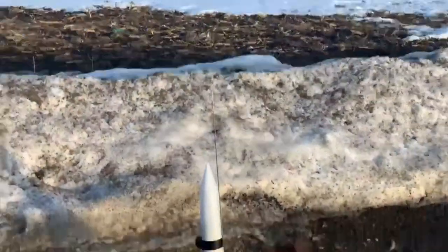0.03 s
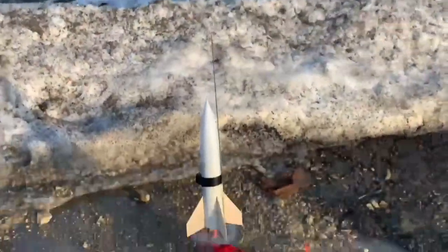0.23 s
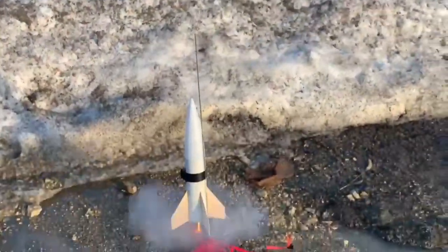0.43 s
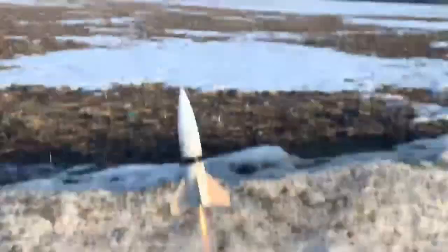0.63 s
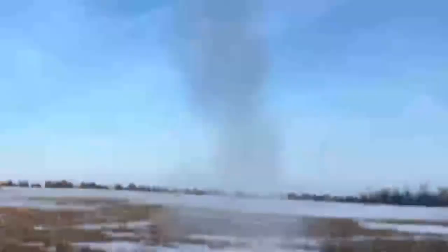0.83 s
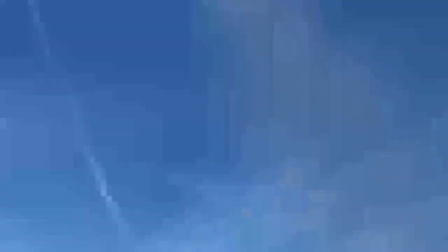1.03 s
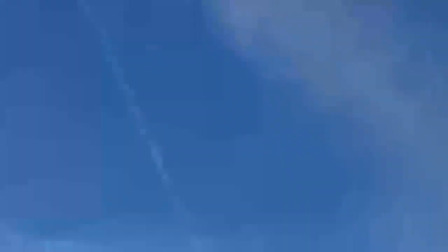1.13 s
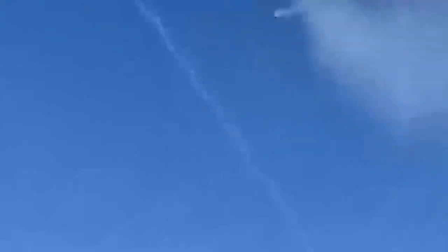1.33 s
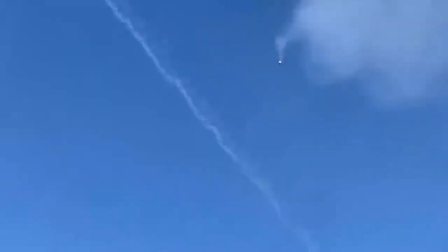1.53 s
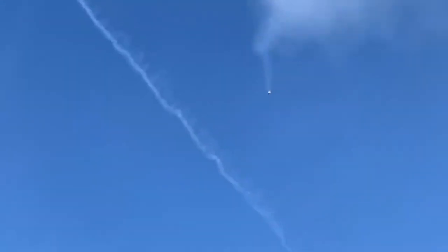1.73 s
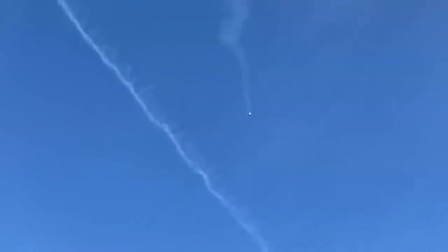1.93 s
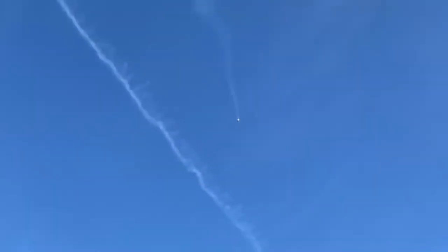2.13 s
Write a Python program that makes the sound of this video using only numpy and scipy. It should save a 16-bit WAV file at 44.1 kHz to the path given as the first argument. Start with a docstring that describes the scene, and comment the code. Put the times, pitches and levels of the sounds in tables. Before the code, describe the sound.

A model rocket lifts off a few steps away in an open field. The motor catches with thin pops, hisses loudly, whooshes past and fades to a distant sputter. Faint wind and soft microphone bumps remain.

```python
"""Model rocket lift-off from a snowy field

A few steps away the igniter fizzes, the motor catches with a few pops, and its jet hisses and howls
on the blast plate. The plume roars past as the rocket leaves the rod, then thins to a distant hiss
until burnout. A light wind and a few soft bumps on the microphone remain."""
import sys
import numpy as np
from scipy import signal
from scipy.fft import rfft, irfft
from scipy.io import wavfile

SR = 44100
rng = np.random.default_rng(int(sys.argv[2]) if len(sys.argv) > 2 else 0)


def log_audio(samples):
    """Write samples as a 16-bit WAV file to the path given in sys.argv[1]."""
    # one column per channel
    frames = np.atleast_2d(samples).T
    # limit to full scale, then quantise
    limited = np.clip(frames, -1, 1)
    pcm = np.round(limited * 32767).astype(np.int16)
    wavfile.write(sys.argv[1], SR, pcm)


N = 97020


def motor():
    """The whole burn, from the pad to the sky, with one turbulent flutter on every layer."""
    flutter_db, flutter_hz = 0.51, 35
    jet = jet_on_plate() + plume() + nozzle_hiss() + climb()
    return jet * from_db(flutter_db * slow_noise(flutter_hz, channels=1))


def jet_on_plate():
    """The jet splashes on the blast plate and howls in a sinking resonance."""
    # splash envelope (time [s], level [dB])
    level = [(.14, -115), (.165, -70), (.196, -56), (.214, -25), (.25, -23), (.31, -21.5), (.41, -16.5),
             (.48, -19.5), (.54, -19.5), (.58, -30.5), (.68, -43.5), (.8, -100)]
    # splash colour (frequency [Hz], level [dB])
    spectrum = [(120, -29), (270, -16), (430, -20.5), (600, -12.5), (1150, -23), (1450, -7.5), (2300, -2.5),
                (3100, -11.5), (3600, -3), (5300, -7.5), (7600, -5), (8700, 3), (10100, -1), (11200, -15),
                (15500, -12.5)]
    # resonance of the jet (time [s], level [dB], centre [Hz])
    howl = [(.19, -110, 1993), (.218, -31.5, 1932), (.33, -31, 1759), (.41, -23, 1654), (.45, -26.5, 1630),
            (.475, -38, 1571), (.56, -32.5, 1545), (.65, -110, 1570)]
    return flow(level, spectrum) + resonance(howl, width_hz=480)


def plume():
    """The free plume roars past with a bright whoosh as the rocket leaves the rod."""
    # roar envelope (time [s], level [dB])
    level = [(.4, -120), (.5, -50.5), (.56, -22), (.6, -21), (.67, -17.5), (.71, -24), (.76, -25),
             (.772, -49.5), (.85, -46.5), (.9, -110)]
    # roar colour (frequency [Hz], level [dB])
    spectrum = [(30, -24.5), (130, -13), (480, -13), (700, -9.5), (1100, -8.5), (1450, -4), (2600, 0),
                (4800, -2), (8000, -4), (10000, -9), (15500, -12.5)]
    # high resonance of the jet (time [s], level [dB], centre [Hz])
    whoosh = [(.42, -120, 7280), (.53, -21, 7180), (.62, -32, 7310), (.69, -33, 7930), (.745, -19, 7760),
              (.8, -68, 7750), (.83, -120, 7750)]
    return flow(level, spectrum) + resonance(whoosh, width_hz=1200)


def nozzle_hiss():
    """The fine hiss of the nozzle carries through the whole burn."""
    # hiss envelope (time [s], level [dB])
    level = [(.185, -115), (.215, -40), (.35, -21), (.42, -13), (.52, -16), (.6, -19.5), (.68, -27),
             (.73, -17), (.78, -18), (.82, -24.5), (.88, -33.5), (1, -35), (1.07, -40.5), (1.16, -69.5),
             (1.25, -110)]
    # hiss colour (frequency [Hz], level [dB])
    spectrum = [(900, -42.5), (2900, -27), (3600, -17), (6400, -9.5), (7500, -12.5), (8200, 0), (9800, 1),
                (11500, -4.5), (15500, -5.5)]
    return flow(level, spectrum)


def climb():
    """The roar from high above sputters, hollowed by a reflection."""
    # distant roar envelope (time [s], level [dB])
    level = [(.66, -120), (.78, -47.5), (.9, -50.5), (.99, -45), (1.05, -50.5), (1.11, -58.5), (1.17, -83),
             (1.3, -110)]
    # distant roar colour (frequency [Hz], level [dB])
    spectrum = [(100, -18.5), (280, -9.5), (500, -24.5), (660, -2.5), (1000, 7.5), (1400, -3), (2400, -2),
                (2900, -6.5), (3700, 3.5), (7500, -8), (12000, -15)]
    # bounce off a surface by the microphone (delay [s], signed gain)
    bounce = [(.00092, -.45)]
    sputter_db, sputter_hz = -1, 37
    roar = flow(level, spectrum) * from_db(sputter_db * slow_noise(sputter_hz, channels=1))
    return reflected(roar, bounce)


def igniter():
    """The igniter fizzes as it burns, just before the motor catches."""
    # fizz envelope (time [s], level [dB])
    level = [(.115, -80), (.13, -69), (.163, -54.5), (.2, -56.5), (.3, -100)]
    # fizz colour (frequency [Hz], level [dB])
    spectrum = [(100, 3.5), (300, -12.5), (700, -4.5), (1050, -1.5), (1600, -15.5), (6500, -37.5)]
    return flow(level, spectrum)


def ignition_pops():
    """The propellant catches in a few thin pops, heard slightly later in the right channel."""
    # pops (time [s], level [dB], pitch [Hz], swell [s])
    pops = [(.2154, -7.5, 1700, 0.00031), (.2156, -15, 3890, 0.00046), (.2193, -17.5, 2100, .0005),
            (.2325, -6, 4040, 0.00061), (.2364, -7.5, 3970, .00033)]
    right_lag_s = .00045
    pulses = puffs(pops, grit=0.27, grit_hz=780, crack=.13, crack_hz=8034)
    treble = rfft(pulses) * above(hz=710)
    delay = np.exp(-2j * np.pi * np.fft.rfftfreq(N, 1 / SR) * right_lag_s)
    return irfft(np.array([treble, treble * delay]), N)


def exhaust_blast():
    """Exhaust buffets the microphone with a mono rumble."""
    # rumble envelope (time [s], level [dB])
    level = [(.19, -88), (.23, -49), (.54, -61), (.6, -42), (.66, -44.5), (.72, -57), (.768, -43.5),
             (.85, -110)]
    # rumble colour (frequency [Hz], level [dB])
    spectrum = [(20, -19), (45, -9), (64, 1), (85, -5.5), (200, -14), (600, -39)]
    return flow(level, spectrum)[0]


def field_echo(x):
    """Faint scatter from the open ground, dying away."""
    # echo colour (frequency [Hz], level [dB])
    spectrum = [(100, -14), (1000, 7), (5000, -9), (9000, -4.5), (15500, -15.5)]
    echo_db, t60_s = -30.5, .9
    tail = noise(spectrum) * from_db(-60 * np.arange(N) / SR / t60_s)
    tail /= np.sqrt(np.sum(tail ** 2, axis=1, keepdims=True))
    return from_db(echo_db) * signal.fftconvolve(x, tail, axes=1)[:, :N]


def bumps():
    """Soft knocks on the microphone, muffled by its housing."""
    # knocks (time [s], level [dB], pitch [Hz], swell [s])
    knocks = [(1.269, -65, 230, .002), (1.478, -68, 279.7, 0.0018), (1.6478, -56, 720, 0.00041),
              (1.712, -53.5, 119, .0038), (1.9, -62.5, 298, 0.0047), (2.016, -58, 400.6, 0.00095)]
    pulses = puffs(knocks, grit=0.55, grit_hz=91, crack=0.12, crack_hz=449)
    return low_pass(pulses, hz=1400)


def wind():
    """A light wind presses on the microphone with a ragged flutter, in mono."""
    # gust envelope (time [s], level [dB])
    level = [(.9, -93), (.99, -72), (1.13, -70.5), (1.21, -64), (1.29, -67), (1.36, -72.5), (1.45, -70.5),
             (1.58, -68), (1.73, -65), (1.91, -59), (2.12, -66.5), (2.2, -66)]
    # wind colour (frequency [Hz], level [dB])
    spectrum = [(20, -11), (45, 1.5), (70, 5), (140, -3), (250, -13), (450, -26), (900, -41.5),
                (3000, -71.5)]
    buffet_db, buffet_hz = 3, 22
    gusts = flow(level, spectrum) * from_db(buffet_db * slow_noise(buffet_hz, channels=1))
    return gusts[0]


def field_ambience():
    """The steady hush of the field."""
    # hush colour (frequency [Hz], level [dB])
    spectrum = [(450, -9.5), (750, 0.5), (1200, -7), (1800, -8.5), (3000, -20), (4500, -26.5), (6000, -35)]
    return from_db(-83.5) * noise(spectrum)


def reflected(x, reflections):
    """Direct sound plus early reflections, whose paths shift as the hand-held microphone sways."""
    sway_share, sway_hz = .05, 4
    now = np.arange(N)
    stretch = 1 + sway_share * slow_noise(sway_hz, channels=1)[0]
    copies = np.zeros_like(x)
    for delay_s, gain in reflections:
        copies += gain * np.array([np.interp(now - delay_s * stretch * SR, now, side) for side in x])
    return (x + copies) / np.sqrt(1 + sum(gain ** 2 for _, gain in reflections))


def microphones(pair):
    """A stereo pair: mono in the bass, diffuse in the mids, the treble slightly later on the left."""
    # stereo image (frequency [Hz], left-right likeness [0-1], left over right [dB])
    image = [(750, 0.75, 1), (1620, 0.4, 0), (2400, 0.6, -0.5), (5600, 0.2, -2), (7100, .82, -0.5),
             (10000, 1, 0.05), (15000, 1, 0)]
    mono_below_hz, left_lag_s, lag_above_hz = 520, .000213, 2620
    alike, balance_db = in_frequency(image)
    apart = np.clip((1 - alike) / 2, 0, 1) * above(mono_below_hz)
    mid, side = rfft(pair) * np.sqrt([1 - apart, apart])
    delay = np.exp(-2j * np.pi * np.fft.rfftfreq(N, 1 / SR) * left_lag_s * above(lag_above_hz))
    lean = from_db(balance_db * above(mono_below_hz) / 2)
    return irfft(np.array([(mid + side) * delay * lean, (mid - side) / lean]), N)


def flow(level, spectrum):
    """Turbulent flow of one colour that swells and fades."""
    db, = in_time(level)
    return from_db(db) * noise(spectrum)


def resonance(curve, width_hz):
    """Turbulence ringing in a resonance whose centre glides."""
    db, hz = in_time(curve)
    wobble = slow_noise(width_hz / 2, channels=2) + 1j * slow_noise(width_hz / 2, channels=2)
    return from_db(db) * np.real(wobble * np.exp(2j * np.pi * np.cumsum(hz) / SR))


def puffs(rows, grit, grit_hz, crack, crack_hz):
    """Short pressure pulses that crack, ring a few ragged cycles and die."""
    out = np.zeros(N)
    for start_s, db, hz, swell_s in rows:
        age = np.maximum(np.arange(N) / SR - start_s, 0)
        envelope = age / swell_s * np.exp(1 - age / swell_s)
        rough_sin, rough_cos = grit * slow_noise(grit_hz, channels=2)
        snap, = crack * slow_noise(crack_hz, channels=1)
        phase = 2 * np.pi * hz * age
        ring = (1 + rough_sin) * np.sin(phase) + rough_cos * np.cos(phase)
        out += from_db(db) * envelope * (ring + snap)
    return out


def noise(spectrum):
    """Two unrelated noises of one colour, without subsonics."""
    db, = in_frequency(spectrum)
    white = rfft(rng.standard_normal((2, N)))
    return rms_one(irfft(white * from_db(db) * above(hz=24), N))


def slow_noise(hz, channels):
    """Random motion that rolls off above hz."""
    return rms_one(low_pass(rng.standard_normal((channels, N)), hz))


def low_pass(x, hz):
    """Gentle roll-off above hz."""
    return signal.sosfilt(signal.butter(2, hz, fs=SR, output="sos"), x)


def above(hz):
    """Smooth step from 0 below hz to 1 above it, at every frequency bin."""
    ratio = (np.fft.rfftfreq(N, 1 / SR) / hz) ** 8
    return ratio / (1 + ratio)


def in_time(rows):
    """Each column of a curve, at every sample."""
    times, *columns = np.transpose(rows)
    return [np.interp(np.arange(N) / SR, times, c) for c in columns]


def in_frequency(rows):
    """Each column of a spectrum, at every frequency bin."""
    hz, *columns = np.transpose(rows)
    bins = np.maximum(np.fft.rfftfreq(N, 1 / SR), 1)
    return [np.interp(np.log(bins), np.log(hz), c) for c in columns]


def from_db(db):
    """Decibels to gain."""
    return 10 ** (np.asarray(db) / 20)


def rms_one(x):
    """Scale to unit rms."""
    return x / np.sqrt(np.mean(np.abs(x) ** 2))


def scene():
    """The launch and its echo over the quiet field, with wind and bumps on the microphone."""
    # early reflections from nearby surfaces (delay [s], signed gain)
    reflections = [(.00098, -0.084), (.0026, -0.39)]
    rocket = reflected(igniter() + motor(), reflections)
    hush = field_ambience()
    airborne = microphones(rocket + field_echo(rocket) + hush) + ignition_pops()
    return airborne + wind() + exhaust_blast() + bumps()


def record(dry):
    """A quick fade-in after a moment of silence, and a steep cut of the top end."""
    start_s, fade_s, cutoff_hz = 0.11, 0.00565, 15800
    fade_in = np.clip((np.arange(N) / SR - start_s) / fade_s, 0, 1)
    return signal.sosfilt(signal.ellip(12, .1, 90, cutoff_hz, fs=SR, output="sos"), dry * fade_in)


dry = scene()
out = record(dry)
log_audio(out)
```